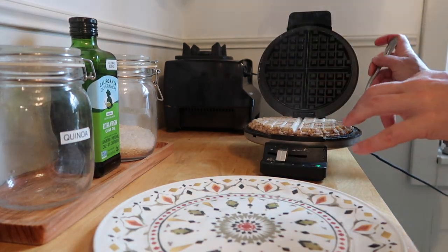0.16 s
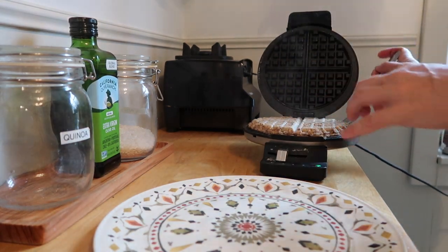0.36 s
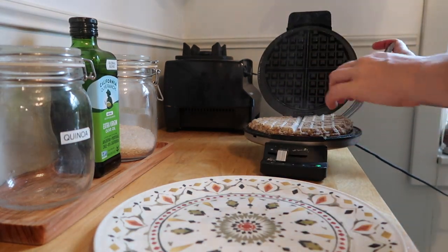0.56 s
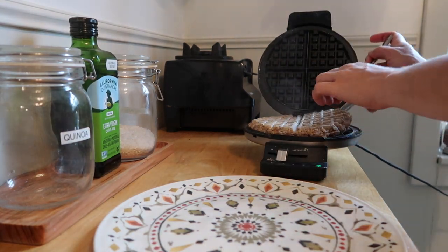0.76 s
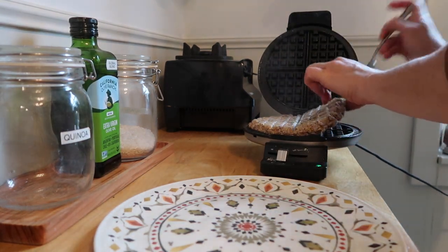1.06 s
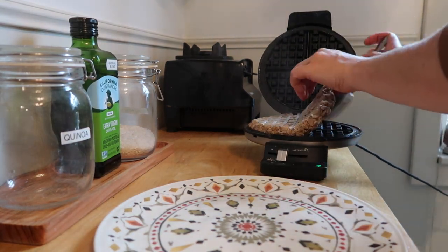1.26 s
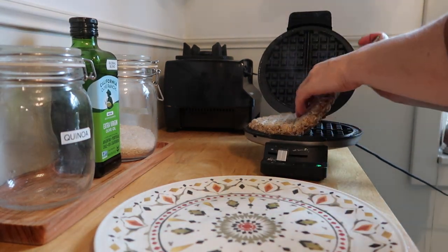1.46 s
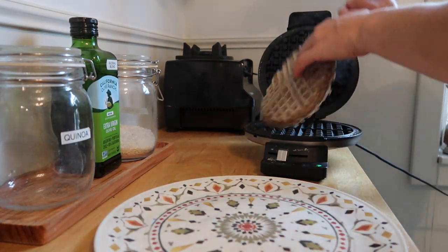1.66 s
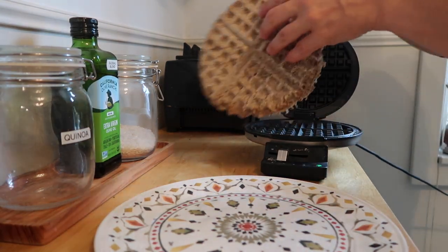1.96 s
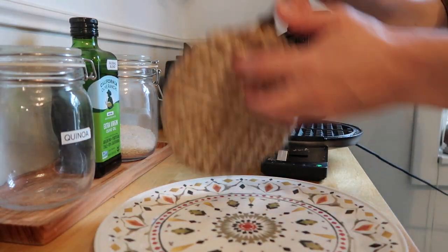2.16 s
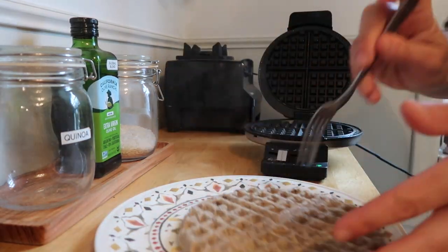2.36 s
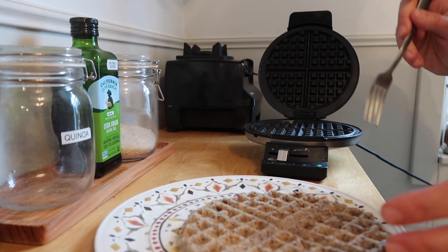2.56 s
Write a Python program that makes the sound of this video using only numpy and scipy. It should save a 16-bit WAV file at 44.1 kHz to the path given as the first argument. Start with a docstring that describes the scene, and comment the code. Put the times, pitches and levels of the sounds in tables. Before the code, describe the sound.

In a kitchen with a steady low hum, a fork lightly taps a waffle iron and crust crackles softly. Then the waffle slaps onto a plate near the microphone, briefly ringing the ceramic and the wooden counter.

```python
"""A kitchen, with a camera's stereo microphone close to a ceramic plate on a wooden counter.
An appliance hums under room air. A crisp waffle is prised off its iron with faint crackles and fork taps.
Dropped on the plate, it crunches and thuds edge first, then slaps flat: plate and counter ring,
and the kitchen answers. The camera clips the slap and turns its gain down."""
import sys
import numpy as np
from scipy import signal
from scipy.fft import rfft, irfft
from scipy.io import wavfile
from scipy.ndimage import uniform_filter1d

SR = 44100
rng = np.random.default_rng(int(sys.argv[2]) if len(sys.argv) > 2 else 0)


def wav_out(sig):
    """Save sig, one row per channel (or a flat mono array), as 16-bit PCM at SR to the path in sys.argv[1]."""
    wavfile.write(sys.argv[1], SR, np.round(np.clip(np.atleast_2d(sig).T, -1, 1) * 32767).astype(np.int16))


N = 119070
T = np.arange(N) / SR
F = np.maximum(np.fft.rfftfreq(N, 1 / SR), 1)

# The waffle meeting the plate (time [s], knock [dB], clink [dB], crunch [dB], crunch fall [s])
PLATE_CONTACTS = [(2.284, -40, -65, -31, 0.0057), (2.289, -26.5, -40, -33, 0.02),
                  (2.299, -19, -40, -31.5, 0.005), (2.306, -13.5, -40, -36, 0.0078),
                  (2.313, -17, -28.5, -40, 0.013), (2.333, -30, -29.5, -32.5, 0.006),
                  (2.344, -16.5, -16, -19, 0.0075), (2.350, -12, -16.5, -25.5, 0.0081),
                  (2.357, -14.5, -14, -14.5, 0.0063), (2.362, -9, -10, -5, 0.0044),
                  (2.365, -10.5, -15, -6.5, 0.0049), (2.376, -10.5, -21.5, -33.5, .01),
                  (2.390, -12, -20, -33, .01), (2.400, -27, -20.5, -42, .008), (2.412, -24, -23, -38, .01),
                  (2.419, -15.5, -30, -42, .008), (2.431, -37, -23.5, -27, 0.0057),
                  (2.452, -32, -36, -52, .008), (2.473, -38, -36, -54, .008),
                  (2.493, -41, -36, -50, 0.0095)]


def undb(db):
    return 10 ** (np.asarray(db) / 20)


def unit(x):
    return x / np.sqrt(np.mean(x ** 2))


def colour(x, table, turn=1):
    """Filter by (frequency [Hz], gain [dB]) points; turn shifts the phase."""
    hz, db = np.array(table, float).T
    return irfft(rfft(x) * turn * undb(np.interp(np.log(F), np.log(hz), db)), N)


def band(x, hz):
    return unit(signal.sosfilt(signal.butter(3, hz, "bandpass", fs=SR, output="sos"), x))


def wander(rate_hz):
    """Slow random wander, rms 1."""
    width = int(SR / rate_hz)
    smoothed = uniform_filter1d(rng.standard_normal(N), width, mode="wrap")
    return unit(uniform_filter1d(smoothed, width, mode="wrap"))


def swell(at, rise_s, fall_s):
    """Exponential rise to 1 and exponential fall."""
    return np.exp(-np.where(T < at, (at - T) / rise_s, (T - at) / fall_s))


def grit(per_s, scatter_db):
    """Dense tiny clicks of uneven size."""
    chance, polarity, size = rng.random((3, N))
    clicks = (chance < per_s / SR) * np.sign(polarity - .5)
    return unit(clicks * undb(-scatter_db * np.log(1 - size)))


def ring(times, levels_db, modes, push_s, scatter_db=3.5, detune=0.01):
    """Each blow rings every mode at a scattered strength and pitch; a longer push sounds duller."""
    hz, db, t60 = np.array(modes, float).T[:, :, None]
    scatter = rng.standard_normal((len(times), 2, len(modes), 1))
    ringing, t = np.zeros(N + SR), T[:SR // 2]
    for at, blow_db, (size, shift) in zip(times, levels_db, scatter):
        decays = undb(blow_db + db + scatter_db * size - 60 * t / t60)
        tones = np.sin(2 * np.pi * hz * (1 + detune * shift) * t)
        ringing[int(at * SR):][:len(t)] += np.sum(decays * tones, axis=0)
    push = np.exp(-.5 * ((np.arange(400) / SR - 3 * push_s) / push_s) ** 2)
    return -signal.fftconvolve(ringing, push / push.sum())[:N]


def room_air(level_db=-38.5):
    """Steady room tone as mid and side, wider toward the treble."""
    # Spectrum of the air (frequency [Hz], relative density [dB])
    spectrum = [(15, -45), (25, -12.5), (48, -10.5), (80, -5.5), (250, -3), (436, -12), (472, -7),
                (569, -14.5), (824, -17.5), (1870, -25.5), (2080, -28), (2940, -31.5), (3440, -34.5),
                (12600, -44), (14000, -55.5)]
    # Width of the air at the microphone (frequency [Hz], side minus mid [dB])
    width = [(60, -29), (110, -17.5), (200, -16), (380, -10), (700, -10), (1290, -8.5), (2380, -4.5),
             (4400, -2.5), (8120, -2.5), (15000, 12.5)]
    mid, side = (colour(noise, spectrum) for noise in rng.standard_normal((2, N)))
    gain = undb(level_db) / np.std(mid)
    return gain * mid, gain * colour(side, width)


def appliance_hum(waver_db=2.5, drift_hz=2.54):
    """An appliance in the background: each tone wavers in level and pitch."""
    # Tones of the hum (frequency [Hz], rms level [dB])
    tones = [(118.4, -50), (473.7, -46.5), (538.3, -53.5), (839.8, -62.5), (1927, -64), (2729, -67.5),
             (2907, -67)]
    hum = np.zeros(N)
    for hz, db in tones:
        amplitude = np.sqrt(2) * undb(db + waver_db * wander(34))
        phase = 2 * np.pi * np.cumsum(hz + drift_hz * wander(12.1)) / SR
        hum += amplitude * np.sin(phase + 2 * np.pi * rng.random())
    return hum


def kitchen_reverb(x, level_db=-5, t60_s=0.31, delay_s=0.0028, band_hz=(300, 3980)):
    """The room answers with a decaying scatter of reflections, dulled and light in the bass."""
    tail = rng.standard_normal(N) * undb(-60 * T / t60_s) * (T > delay_s)
    tail /= np.sqrt(np.sum(tail ** 2))
    tail = signal.lfilter(*signal.butter(1, band_hz, "bandpass", fs=SR), tail)
    return undb(level_db) * signal.fftconvolve(x, tail)[:N]


def crust_crackles(treble_hz=(2490, 11500), body_hz=(650, 2060)):
    """Crust crackles on the iron, in the fingers and as its edge meets the plate."""
    # Flurries of clicks (peak time [s], rise [s], fall [s], treble [dB], body [dB])
    flurries = [(.28, 0.024, .015, -52.5, -55), (.365, 0.027, 0.03, -52.5, -51.5),
                (.775, 0.0078, .01, -60, -69), (1.46, 0.068, 0.012, -52.5, -46),
                (1.7, 0.077, 0.018, -59, -52), (2.147, .004, 0.0087, -52, -47.5),
                (2.192, .004, 0.0076, -53.5, -67.5), (2.286, .003, .018, -35.5, -48),
                (2.331, 0.0045, .005, -41, -42)]
    treble, body = (band(grit(per_s=7200, scatter_db=1.2), hz) for hz in (treble_hz, body_hz))
    return sum(swell(at, rise, fall) * (undb(treble_db) * treble + undb(body_db) * body)
               for at, rise, fall, treble_db, body_db in flurries)


def fork_taps(push_s=0.00003):
    """A fork taps the waffle iron: the iron knocks and the tines ping."""
    # Light taps (time [s], knock [dB], ping [dB])
    taps = [(.333, -42.5, -50), (.355, -43, -52), (.362, -37.5, -53)]
    # Modes of the iron and of the tines (frequency [Hz], relative level [dB], t60 [s])
    iron_modes = [(586, 5, .03), (740, -3, 0.025), (993, 1.5, 0.043), (1300, 2.5, 0.037)]
    tine_modes = [(3040, -14, .03), (4000, 3, 0.052)]
    at, knock_db, ping_db = np.array(taps).T
    return ring(at, knock_db, iron_modes, push_s) + ring(at, ping_db, tine_modes, push_s)


def counter_boom(settle_s=2.495, settle_t60_s=0.05):
    """The waffle's weight rings the wooden counter; the plate comes to rest and damps it."""
    # Shoves of the plate into the counter (time [s], level [dB])
    shoves = [(2.285, -22), (2.3072, -28.5), (2.327, -18), (2.345, -9.5), (2.362, -4), (2.382, -11)]
    # Modes of the counter (frequency [Hz], relative level [dB], t60 [s])
    wood_modes = [(105.3, -8, 0.57), (167.2, 3.5, 0.14), (262, -13, 0.11), (338, -24.5, 0.15)]
    at, shove_db = np.array(shoves).T
    damping = undb(-60 * np.maximum(T - settle_s, 0) / settle_t60_s)
    return ring(at, shove_db, wood_modes, push_s=0.00042) * damping


def crust_crunch(rise_s=0.0018):
    """Each contact with the plate crushes crust into a burst of tiny clicks."""
    # Colour of crushed crust (frequency [Hz], relative level [dB])
    spectrum = [(180, -19.5), (400, -6), (730, -2.5), (1840, -11), (2600, -6.5), (3800, -9), (4500, -16),
                (6670, -18), (12500, -34.5), (15500, -55)]
    bursts = sum(undb(db) * swell(at, rise_s, fall) for at, _, _, db, fall in PLATE_CONTACTS)
    return bursts * unit(colour(grit(per_s=12000, scatter_db=2), spectrum))


def plate_slap():
    """Each contact knocks waffle and plate hollowly, and the hard crust clinks the ceramic."""
    # Modes of waffle and plate body (frequency [Hz], relative level [dB], t60 [s])
    hollow_modes = [(529, -15.5, 0.023), (538, -7, 0.14), (610, -1.5, 0.061), (653.6, 2, 0.054),
                    (760, -12.5, 0.022), (848, -5.5, 0.027)]
    # Bright modes of the plate (frequency [Hz], relative level [dB], t60 [s])
    ceramic_modes = [(972, -4, 0.043), (1112, -6.5, 0.062), (1300, -12, 0.041), (1500, -7, 0.074),
                     (1640, -2.5, 0.04), (2075, -1.5, 0.058), (2532, 1, 0.043), (2540, -4, 0.078),
                     (2685, -21, 0.045), (2966, -1, 0.026), (3283, -6.5, 0.054), (3710, -5.5, 0.044),
                     (3896, -12.5, .07), (5420, -19, 0.03)]
    at, knock_db, clink_db, _, _ = np.array(PLATE_CONTACTS).T
    knock = ring(at, knock_db, hollow_modes, push_s=0.00013)
    clink = ring(at, clink_db, ceramic_modes, push_s=0.00003)
    return knock + clink


def scene():
    """Left and right at the microphone: the waffle close up, the kitchen behind it."""
    # Width of close sounds (frequency [Hz], side minus mid [dB])
    near_width = [(60, -33), (110, -51.5), (200, -26), (380, -26), (700, -26.5), (1290, -18), (2380, -12.5),
                  (4400, -3), (8120, -0.5), (15000, 8)]
    handling = crust_crackles() + fork_taps()
    landing = crust_crunch() + counter_boom() + plate_slap()
    low_cut = signal.butter(2, 100, "highpass", fs=SR, output="sos")
    near = handling + signal.sosfilt(low_cut, landing)
    air_mid, air_side = room_air()
    mid = air_mid + appliance_hum() + near + kitchen_reverb(near)
    side_reverb = undb(-1) * kitchen_reverb(near)
    # The microphone ports differ by a part shifted a quarter cycle.
    side = air_side + colour(near + side_reverb, near_width, turn=-1j)
    return np.array([mid + side, mid - side])


def record(dry):
    """The camera's gain drops after loud sound and creeps back; peaks clip softly; the top is cut."""
    threshold_db, cut_share, attack_s, release_db_per_s = -20.5, 0.49, 0.04, 4
    drive, top_hz = 1.073, 15650
    window = int(attack_s * SR)
    lag = lambda v: signal.lfilter(np.ones(window) / window, 1, v)
    level_db = 10 * np.log10(lag(np.mean(dry ** 2, axis=0)) + 1e-12)
    wanted_cut_db = np.maximum(level_db - threshold_db, 0) * cut_share
    release_db = release_db_per_s * T
    cut_db = np.maximum(np.maximum.accumulate(wanted_cut_db + release_db) - release_db, 0)
    driven = drive * dry * undb(-lag(cut_db))
    clipped = driven / (1 + driven ** 6) ** (1 / 6)
    return signal.sosfilt(signal.ellip(8, .2, 70, top_hz, fs=SR, output="sos"), clipped)


dry = scene()
out = record(dry)
wav_out(out)
```